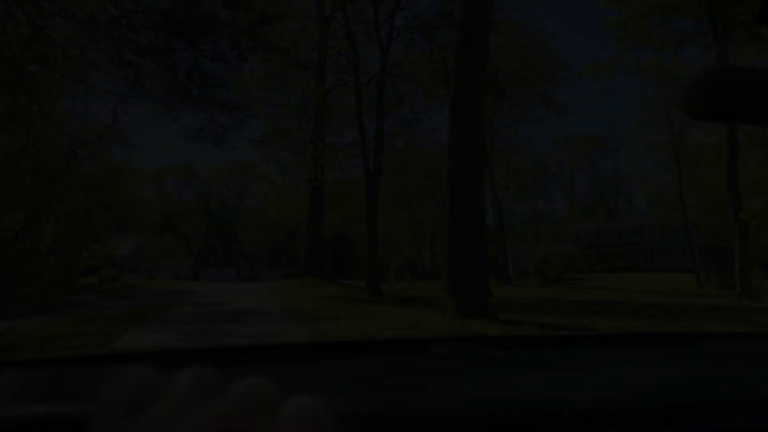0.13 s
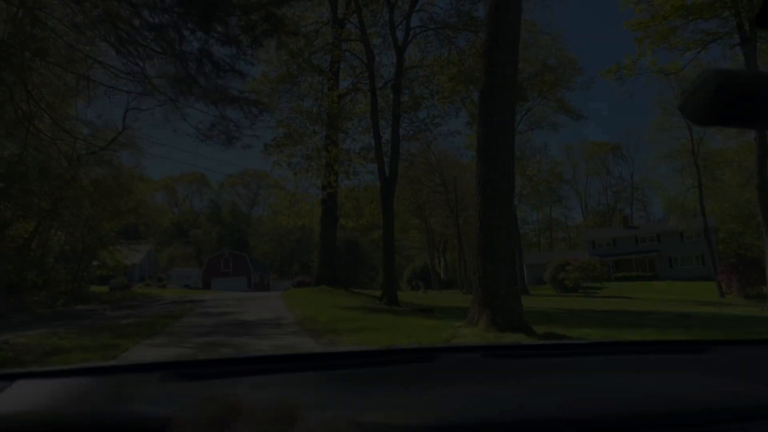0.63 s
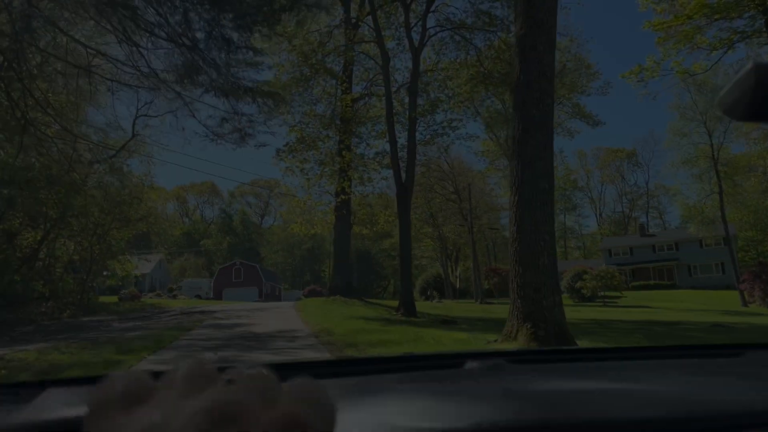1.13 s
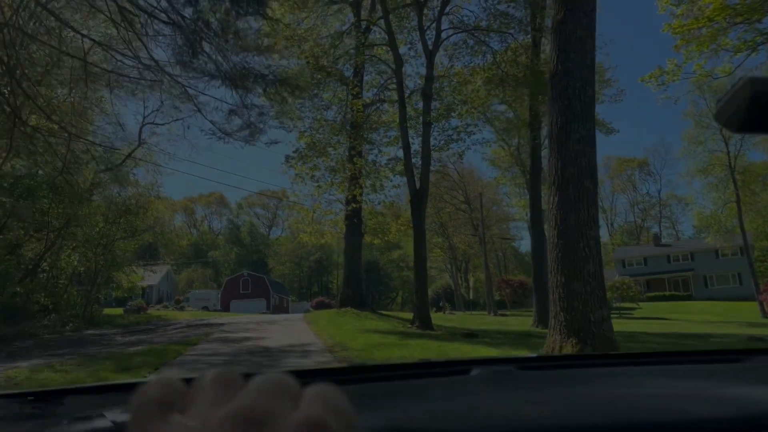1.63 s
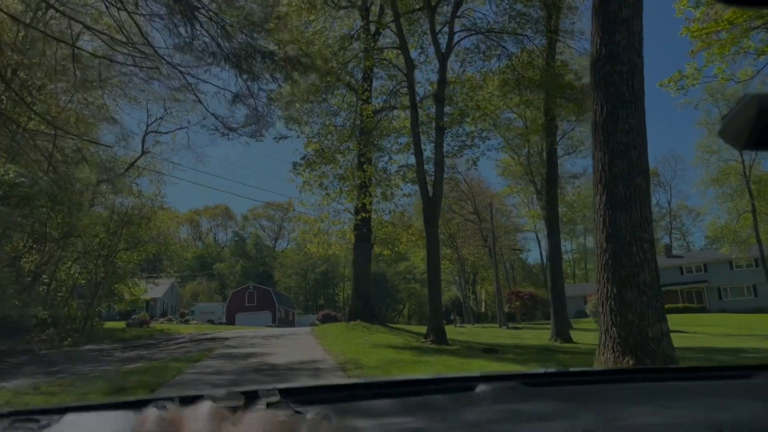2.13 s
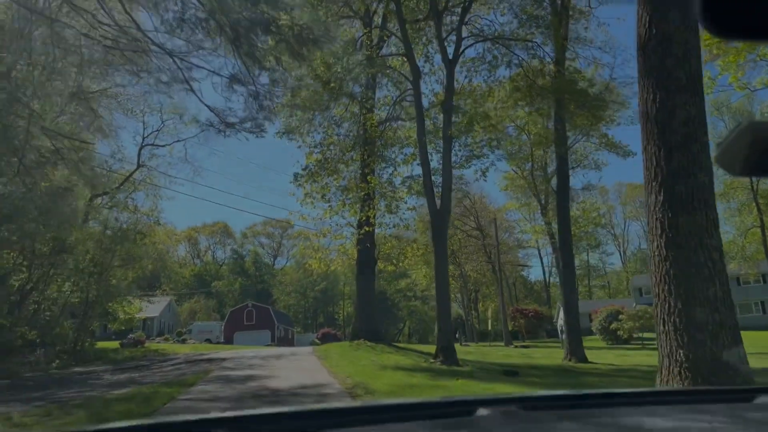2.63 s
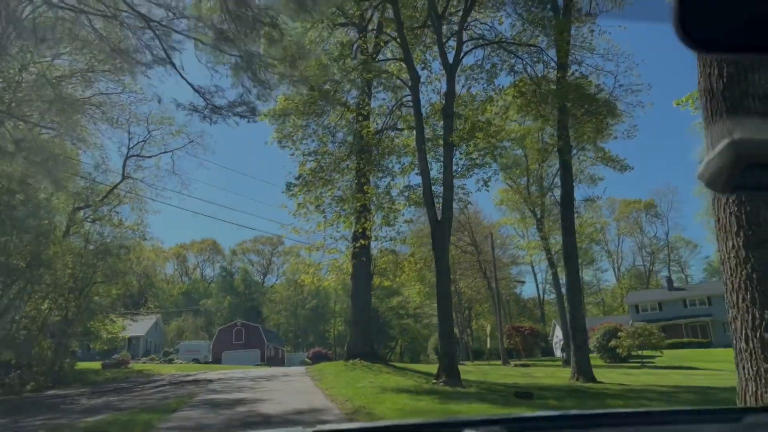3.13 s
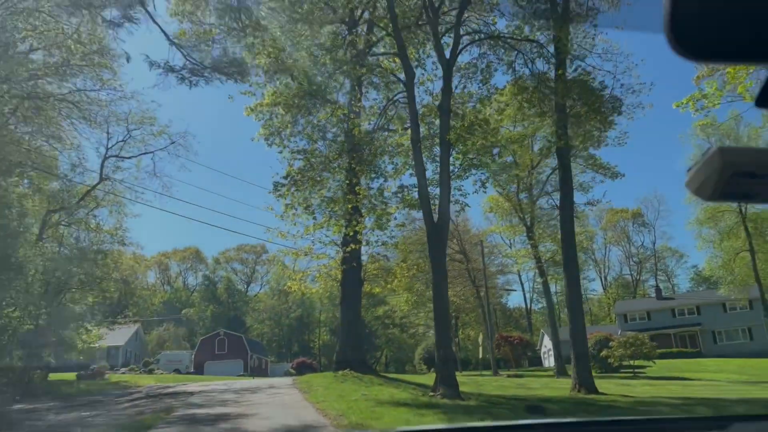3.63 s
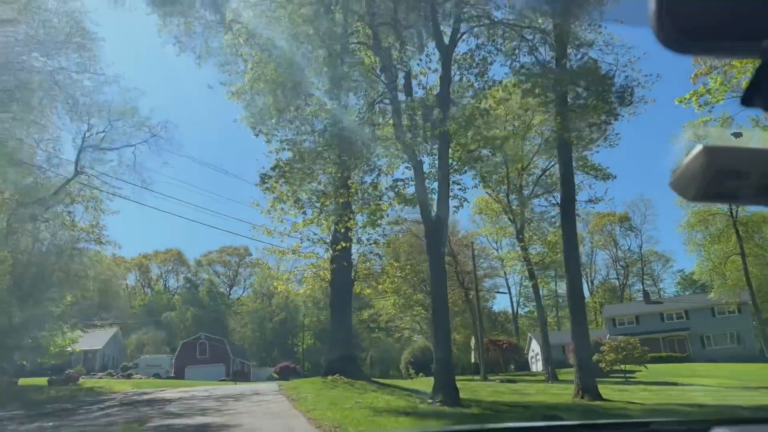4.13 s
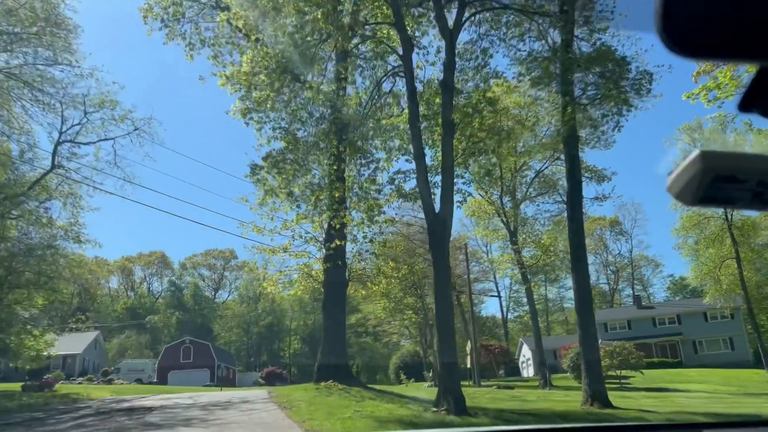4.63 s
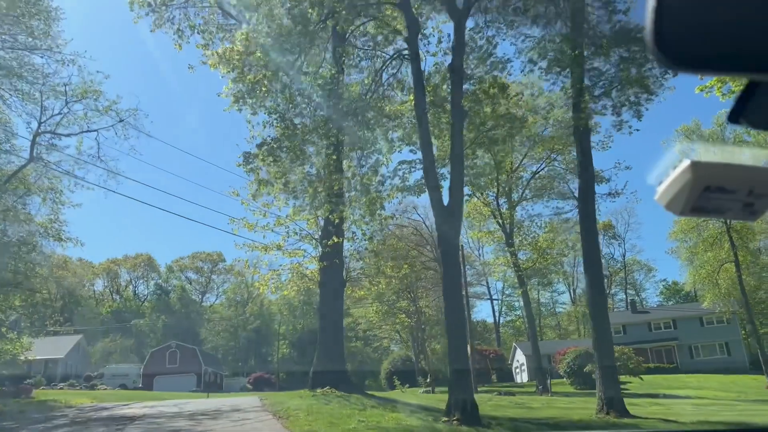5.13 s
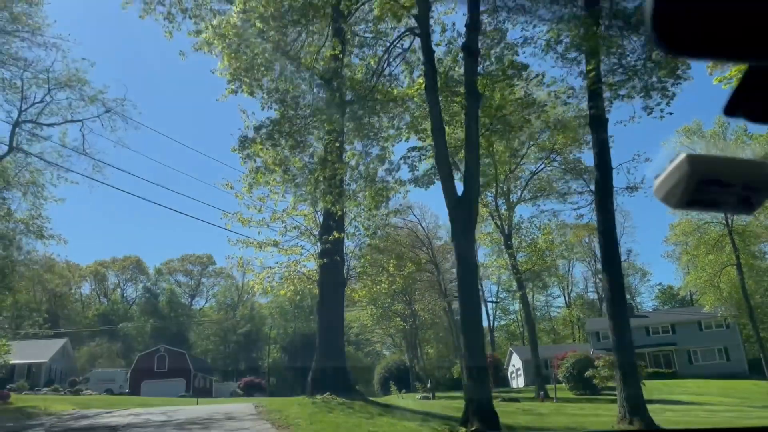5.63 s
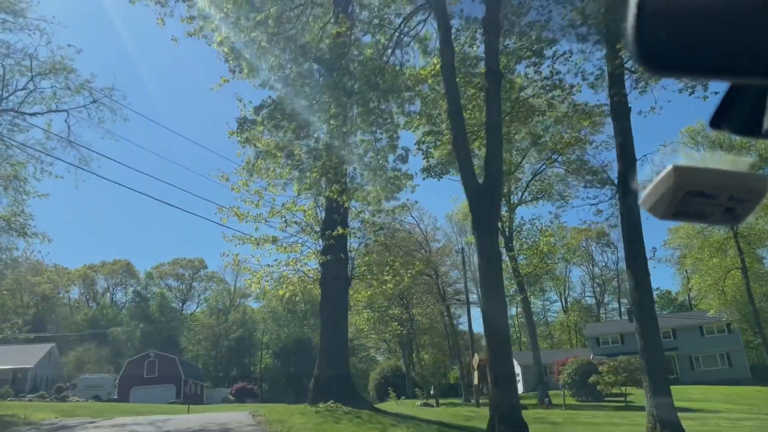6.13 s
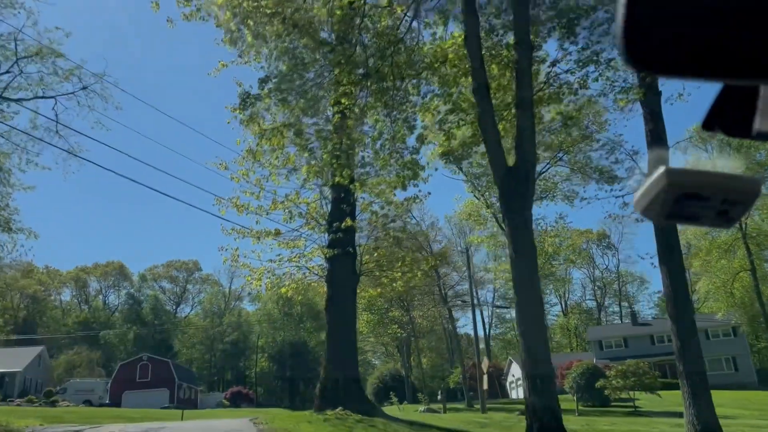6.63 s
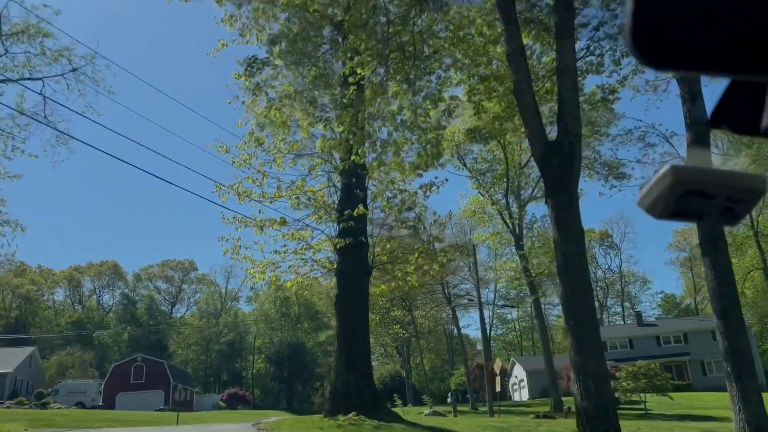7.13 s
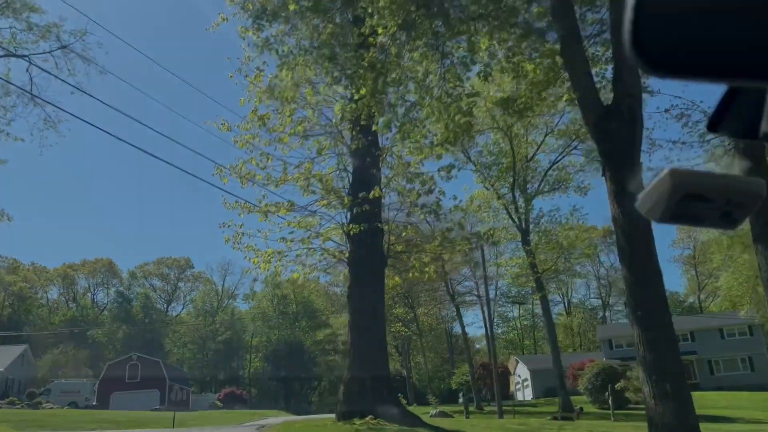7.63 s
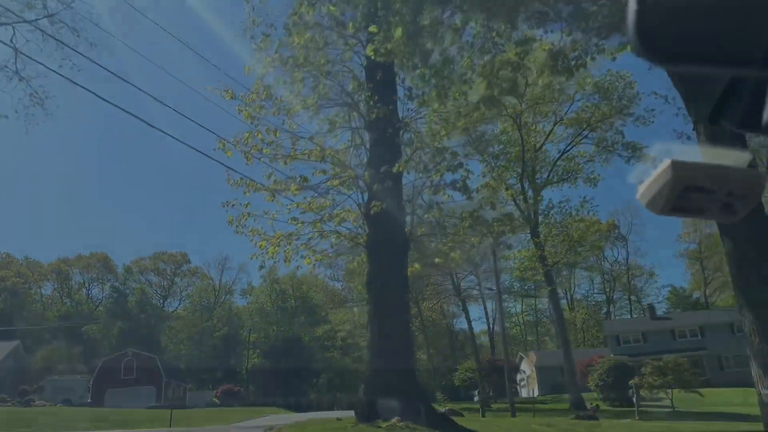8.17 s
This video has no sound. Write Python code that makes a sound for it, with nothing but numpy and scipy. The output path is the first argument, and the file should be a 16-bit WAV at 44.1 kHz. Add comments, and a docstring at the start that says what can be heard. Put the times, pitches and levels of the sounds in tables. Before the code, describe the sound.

Busy stereo birdsong in a leafy yard. A sparse opening with jay calls gives way to a steady chant on the right and a fast trill at far left. A loud central warbler and long clear whistles dominate the middle, then rapid nasal calls at left. Later the chant returns and a close singer grows louder at far right. Trees add a soft echo; distant traffic stays faint.

```python
"""Morning chorus among tall trees

Whistling birds repeat gliding notes from perches around the listener. Jays and a nasal caller sing
stacks of harmonics, a sparrow buzzes with fast vibrato, a wren rattles off chips and a dove coos.
Decaying noise makes the trees' echo. Many faint glides make the far birds; coloured noise makes
the far traffic, rumble, drone, haze and thin hiss."""
import sys
import numpy as np
from scipy import signal
from scipy.fft import rfft, irfft
from scipy.io import wavfile
from scipy.ndimage import uniform_filter1d

SR = 44100
rng = np.random.default_rng(int(sys.argv[2]) if len(sys.argv) > 2 else 0)


def level_to_linear(level):
    """Convert decibel levels to linear amplitude factors, elementwise."""
    exponent = np.asarray(level, float) / 20
    return 10 ** exponent


def digitize_waveform(pressure):
    """Quantize a signal to 16-bit integers and store it at the path in sys.argv[1].

    Rows of a 2-D input are taken as channels; values are limited to [-1, 1].
    """
    field = np.atleast_2d(pressure).T
    bounded = np.clip(field, -1, 1)
    quanta = np.round(bounded * 32767).astype(np.int16)
    wavfile.write(sys.argv[1], SR, quanta)


N = 365148  # samples in the scene
T = np.arange(N) / SR  # seconds

# Perches from far right to far left: left_minus_right_db, left_lag_ms, echo_db
PERCHES = [(-26.5, 0.17, -17), (-10, .35, -15.5), (0, 0.047, -14), (10.5, -.47, -5), (11, -.47, -15)]
FAR_RIGHT, RIGHT, CENTRE, LEFT, FAR_LEFT = PERCHES
# Tone colour of the far chorus: pitch_hz, level_db (relative)
HAZE_COLOUR = [(650, -41.5), (1100, -12), (1590, -12.5), (1940, -17.5), (2410, -3.5), (3400, -2),
               (3850, -9.5), (4740, -11.5), (8090, -26.5), (10500, -57), (13000, -57)]


def add(bus, x, start_s, pan_db, lag_ms, echo_db):
    """Place a sound left and right (rows 0, 1) and send it to the trees (rows 2, 3)."""
    for ch, side in enumerate((1, -1)):
        i = int(round((start_s + side * lag_ms / 2000) * SR))
        gain = np.sqrt(2 / (1 + level_to_linear(-2 * side * pan_db)))
        part = x[max(-i, 0):N - i] * gain
        first = max(i, 0)
        bus[ch::2, first:first + len(part)] += part * np.array([[1], [level_to_linear(echo_db)]])


def walk(count, rate):
    """Smooth chance with spread near 1 that turns about rate times a second."""
    k = int(SR / rate)
    steps = np.repeat(rng.standard_normal(count // k + 1), k)
    return 1.46 * uniform_filter1d(uniform_filter1d(steps, k), k)[:count]


def swell(count, rise_ms, fall_ms):
    """Rounded start and end of a note."""
    ms = np.arange(count) * 1000 / SR
    ramp = np.minimum(ms / rise_ms, ms[::-1] / fall_ms)
    return np.sin(np.pi / 2 * np.clip(ramp, 0, 1)) ** 2


def tone(hz):
    """Sine of rms 1 on a moving pitch."""
    return np.sqrt(2) * np.sin(2 * np.pi * (np.cumsum(hz) / SR + rng.random()))


def harmonic(k, phase):
    """One harmonic of a voice, with its own fixed starting phase."""
    return np.sin(2 * np.pi * k * phase + k * k)


def breath_noise(count, low_hz, high_hz):
    """Noise kept to one band, for the rough air in a voice."""
    band = signal.butter(2, [low_hz, high_hz], "band", fs=SR, output="sos")
    return signal.sosfilt(band, rng.standard_normal(count))


def whistle(ms, start_hz, mid_hz, end_hz, db):
    """A near sine on a bent glide; breath wavers its level, and faint notes flicker more through the leaves."""
    n = int((ms + 4) * SR / 1000)  # 4 ms extra leaves room for the soft ends
    q = np.linspace(-1, 1, n) * (ms + 4) / ms
    slope = (end_hz - start_hz) / 2
    bend = (start_hz + end_hz) / 2 - mid_hz
    hz = mid_hz + slope * q + bend * q ** 2
    waver_db = 1.2 + .08 * max(-44 - db, 0)
    level = level_to_linear(db + waver_db * walk(n, 80))
    return level * swell(n, min(0.34 * ms, 16), min(0.39 * ms, 13)) * tone(hz)


def sing(bus, phrase, times, perch):
    """One phrase at each time; every note strays a little in pitch."""
    for start_s, level_db in times:
        for at, ms, *hz, db in phrase:
            strayed_hz = np.multiply(hz, 1 + 0.0027 * rng.standard_normal())
            add(bus, whistle(ms, *strayed_hz, level_db + db), start_s + at - .002, *perch)


def repeated_phrases(bus):
    """Each whistler repeats one phrase of gliding notes from its perch."""
    # Each first table is a phrase of notes:
    # from_phrase_start_s, length_ms, start_hz, middle_hz, end_hz, level_db (added to the phrase's)
    # Each second table says when the phrase is sung: start_s, level_db
    # loud warbler: rise, drop, arch, long rising slur
    warble = [(0, 52, 2957, 2925, 3223, 0), (.076, 39, 2613, 1893, 1715, -3.5),
              (.152, 49, 3300, 3400, 2720, -2), (.223, 113, 2215, 2452, 2480, 1)]
    warble_times = [(2.588, -41), (3.061, -39), (3.537, -38), (4.038, -39), (7.821, -50)]
    sing(bus, warble, warble_times, CENTRE)
    # the warbler's lead-in: a chip and a steep rise
    lead_in = [(0, 26, 5600, 5000, 5210, -16.5), (.022, 29, 3434, 4256, 4900, 1)]
    lead_in_times = [(2.977, -35.5), (3.454, -34), (3.951, -35), (8.203, -46.5)]
    sing(bus, lead_in, lead_in_times, CENTRE)
    # steady singer, about three phrases a second: rise, short dip, hook, sharp chip, fall
    chant = [(0, 52, 2454, 2505, 2770, -9), (.075, 28, 3070, 2905, 2810, -7.5),
             (.117, 35, 3698, 3327, 4220, 0), (.196, 13, 5500, 4600, 4450, -7),
             (.22, 50, 2367, 2323, 1456, -8)]
    chant_times = [(0.928, -48.5), (1.235, -44), (1.552, -44.5), (1.862, -43), (2.172, -44), (2.493, -44.5),
                   (5.901, -49.5), (6.216, -47), (6.531, -49), (6.842, -50.5), (7.154, -51.5), (7.472, -54)]
    sing(bus, chant, chant_times, RIGHT)
    # singer at the far right whose phrases grow louder
    jingle = [(0, 46, 2150, 2247, 2290, 0), (.058, 15, 2690, 2474, 2400, 3.5),
              (.122, 30, 1577, 1565, 1850, -15), (.151, 20, 2003, 2680, 2550, 2),
              (.204, 15.6, 3620, 3060, 3170, 2)]
    jingle_times = [(7.657, -44.5), (7.887, -37.5), (8.117, -36)]
    sing(bus, jingle, jingle_times, FAR_RIGHT)
    # about five a second: drop, rise, higher rise
    twitter = [(0, 31.9, 3124, 2327, 1990, -2.2), (.042, 30.2, 2560, 2740, 2880, 0.27),
               (.092, 26, 2910, 3170, 3650, -1)]
    twitter_times = [(.052, -55), (0.264, -53.5), (4.398, -52.5), (4.596, -51), (4.796, -50),
                     (4.999, -50.5)]
    sing(bus, twitter, twitter_times, RIGHT)
    # about four a second: long plunge, low rise
    plunge = [(0, 41.94, 3822, 2666, 1900, -5), (.172, 40.2, 1545, 1730, 1860, -10.5)]
    plunge_times = [(5.515, -52.5), (5.775, -50), (6.032, -51.5), (6.286, -54.5), (6.538, -54.5),
                    (6.782, -53), (7.028, -55.5), (7.284, -58.5), (7.531, -58.5)]
    sing(bus, plunge, plunge_times, RIGHT)
    # faint singer: rise, fall, high rise
    lilt = [(0, 43, 2496, 2770, 2930, -1), (.06, 32, 2324, 2190, 1770, -4.5),
            (.188, 42, 4100, 4600, 4980, 1.5)]
    lilt_times = [(5.66, -57), (5.92, -55.5), (6.19, -55), (6.454, -56.5), (6.725, -58.5), (6.995, -58.5)]
    sing(bus, lilt, lilt_times, RIGHT)
    # one faint rising note
    rise = [(0, 40, 3850, 4380, 4960, 0.002)]
    rise_times = [(.155, -61.5), (.495, -62.5), (4.027, -59), (4.355, -58), (4.678, -58.5), (5.0, -56.5),
                  (5.344, -54), (7.534, -64.5)]
    sing(bus, rise, rise_times, LEFT)
    # one higher, thin rising note
    thin_rise = [(0.0014, 40, 6200, 6850, 7400, 0.0094)]
    thin_rise_times = [(1.481, -73), (1.54, -74.5), (2.215, -75), (2.55, -56.5), (2.84, -71.5),
                       (4.614, -64), (6.738, -69.5), (8.091, -78)]
    sing(bus, thin_rise, thin_rise_times, CENTRE)
    # one thin note that dips and returns
    thin_dip = [(0.0014, 175, 7600, 5750, 7500, 0.0028)]
    thin_dip_times = [(1.575, -74)]
    sing(bus, thin_dip, thin_dip_times, CENTRE)
    # near singer: two long clear whistles, the second broken in two
    fee_bee = [(0, 343, 4125, 4001, 4013, 0.0047), (.485, 207, 3510, 3530, 3537, 0.0024),
               (.695, 172, 3515, 3515, 3500, 0)]
    fee_bee_times = [(3.54, -34)]
    # its perch: left_minus_right_db, left_lag_ms, echo_db
    near_perch = (0, .045, -23)
    sing(bus, fee_bee, fee_bee_times, near_perch)
    # a low slur; the octave sounds with it
    low_slur = [(0, 252.5, 1530, 1520, 1463, -1.5), (0, 257, 3085, 3044, 2897, 4)]
    low_slur_times = [(5.089, -64), (5.879, -65), (6.72, -69), (7.52, -76.5)]
    sing(bus, low_slur, low_slur_times, RIGHT)


def trills(bus):
    """An opening fall and rise, then down and up strokes at a steady rate, fading."""
    # Opening notes: from_start_s, length_ms, start_hz, middle_hz, end_hz, level_db (added to the trill's)
    opening = [(0, 35.4, 4075, 3606, 2860, -1.5), (.045, 32.2, 2120, 2546, 2800, -11)]
    # One down and up stroke pair, same columns as the opening
    strokes = [(0, 22, 3800, 3632, 2920, 1.5), (.04, 29.6, 2176, 2594, 2736, -7)]
    # Trills: first_stroke_s, level_db, silent_from_s
    trill_times = [(1.848, -39, 2.47), (7.323, -46, 7.93)]
    opening_s, period_s, fade_db_per_s = .08, .0733, -12.5
    for start_s, db, end_s in trill_times:
        sing(bus, opening, [(start_s - opening_s, db)], FAR_LEFT)
        stroke_times = [(start_s + at, db + fade_db_per_s * at) for at in np.arange(0, end_s - start_s, period_s)]
        sing(bus, strokes, stroke_times, FAR_LEFT)


def single_notes(bus):
    """Lone whistles with straight glides, scattered over the perches."""
    # One list of notes a perch: start_s, length_ms, start_hz, end_hz, level_db
    notes_by_perch = [
        [(0.47, 8.4, 2500, 2900, -59), (7.854, 7, 3900, 3500, -52), (8.083, 16, 5100, 2200, -58),
         (5.314, 59, 3900, 3840, -46.5), (9.3, 18, 2700, 3000, -41)],
        [(.105, 58, 4120, 3950, -51.5), (.215, 213, 4056, 3984, -60), (.428, 96, 3404, 3510, -53),
         (.845, 35, 2390, 1860, -56.5), (2.544, 46, 5900, 6600, -60.5), (3.315, 67, 3947, 3890, -48),
         (3.773, 12, 5795, 4860, -55), (3.953, 16, 6200, 6100, -60.5), (4.171, 49, 5830, 6450, -60.5),
         (5.816, 31, 2450, 1700, -58), (5.895, 57, 4100, 3980, -45.5), (6.16, 150, 2863, 2936, -56.5)],
        [(2.528, 10, 5950, 5030, -58), (2.536, 24, 5090, 4970, -46.5), (2.995, 30, 4840, 5510, -58),
         (4.82, 52, 5570, 5270, -65.5), (5.35, 94, 1150, 1106, -74), (5.99, 90, 5300, 5130, -64.5),
         (7.743, 35, 5090, 4890, -59.5)],
        [(1, 9.1, 5382, 5900, -66), (1.93, 33.5, 3300, 2400, -44), (7.415, 100, 1250, 2100, -76.5),
         (7.525, 39, 4100, 6500, -70), (5.111, 89, 2450, 2560, -58)],
        [(.385, 15, 4430, 4900, -62), (.47, 18, 2945, 3440, -50), (.995, 7.4, 4800, 6000, -51.5),
         (3.196, 9.4, 3170, 6070, -42), (3.202, 11, 5690, 3180, -41), (4.939, 25, 4660, 4600, -60.5),
         (5.285, 54, 6720, 5830, -67.5), (5.64, 14, 4920, 6100, -57), (7.199, 82, 7340, 7450, -75)],
    ]
    for perch, notes in zip(PERCHES, notes_by_perch):
        for start_s, ms, start_hz, end_hz, db in notes:
            note = whistle(ms, start_hz, (start_hz + end_hz) / 2, end_hz, db)
            add(bus, note, start_s - .002, *perch)


def arches(bus):
    """High whistles that rise, hold and plunge."""
    # Notes: start_s, length_ms, top_hz, level_db
    arch_notes = [(4.254, 67, 7330, -45), (4.344, 33, 6920, -45), (4.428, 54, 6370, -45)]
    # Pitch curve: share_of_note, share_of_top_pitch
    arch_shape = [(0, .86), (.15, .95), (.45, .99), (.72, 1.0), (.86, .96), (1, .64)]
    # Where they are: left_minus_right_db, left_lag_ms, echo_db
    arch_perch = (13, -.42, -21.5)
    for start_s, ms, top_hz, db in arch_notes:
        n = int(ms * SR / 1000)
        curve = np.interp(np.linspace(0, 1, n), *np.transpose(arch_shape))
        hz = uniform_filter1d(top_hz * curve, size=100, mode="nearest")
        add(bus, level_to_linear(db) * swell(n, 6.8, 2.7) * tone(hz), start_s, *arch_perch)


def jays(bus):
    """A harmonic stack that scoops up, sags, and turns hoarse towards its end."""
    # Calls: start_s, length_s, top_pitch_hz, end_pitch_hz, level_db (at the start), left_minus_right_db
    calls = [(-.05, .235, 849, 781, -53.5, 6.5), (0.691, 0.25, 852.4, 796.6, -44.5, 2),
             (3.043, 0.25, 812, 780, -51, -19), (5.42, .27, 805.4, 806, -48, -26),
             (6.93, 0.22, 811, 789, -56.5, -16)]
    # Voice: harmonic_number, level_db (within the call)
    voice = [(1, -25), (2, -8), (3, -13), (4, 3), (5, -15), (6, -10), (7, -10), (8, -16), (9, -39),
             (10, -38)]
    for start_s, length_s, top_hz, end_hz, db, pan_db in calls:
        n = int(length_s * SR)
        q = np.linspace(0, 1, n)  # share of the call
        hz = np.interp(q, [0, .1, .5, .92, 1], [0.77 * top_hz, top_hz, .99 * top_hz, end_hz, end_hz])
        hoarse = .3 + .9 * q
        phase = np.cumsum(hz * (1 + .007 * hoarse * walk(n, 600))) / SR
        # a throb near 250 Hz adds side tones around each harmonic
        flutter = 1 + .3 * np.sin(2 * np.pi * np.cumsum(250 + 20 * walk(n, 100)) / SR)
        stack = np.zeros(n)
        for k, h_db in voice:
            waver_db = 2.2 * hoarse * walk(n, 150) + 2.43 * walk(n, 44.7)
            dulling_db = -0.25 * k * q
            stack += level_to_linear(h_db + waver_db + dulling_db) * harmonic(k, phase)
        rasp = level_to_linear(-22) * hoarse * breath_noise(n, 2300, 7000)
        call = level_to_linear(db - 3.2 * q) * swell(n, 32, 24) * (flutter * stack + rasp)
        add(bus, call, start_s, pan_db, .02, -10)


def nasal_caller(bus):
    """A rich stack on an arched pitch; the ninth harmonic is set loudest."""
    # Calls: start_s, length_s, top_pitch_hz, level_db, treble_tilt_db (per harmonic above the tenth)
    calls = [(4.51, 0.17, 381.7, -49.5, -1.1), (4.781, 0.14, 403.6, -49.5, -0.7),
             (4.989, 0.12, 412.4, -49.5, -1.2), (5.186, .13, 401, -49.5, -0.9), (5.37, .11, 401, -49, -1.4),
             (5.53, .13, 411, -48, -1.75), (5.711, 0.13, 408, -49, -0.95), (5.887, 0.11, 400, -46, -0.73),
             (6.055, .105, 390.4, -47.5, -0.43), (6.193, 0.099, 397, -45.5, -0.63),
             (6.34, 0.087, 367, -51.5, -0.13), (6.51, 0.075, 385, -58.5, -6)]
    # Pitch curve: share_of_call, share_of_top_pitch
    pitch_arch = [(0, .82), (.2, .93), (.45, .99), (.75, 1.0), (.9, .98), (1, .9)]
    # Voice, read between its points: harmonic_number, level_db (within the call)
    voice = [(4, -36), (7, -19), (8, -8), (9, -2), (10, -16), (12, -19), (14, -18), (16, -30), (20, -40),
             (32, -58)]
    for start_s, length_s, top_hz, db, tilt_db in calls:
        n = int(length_s * SR)
        curve = np.interp(np.linspace(0, 1, n), *np.transpose(pitch_arch))
        hz = uniform_filter1d(top_hz * curve, size=400)
        jitter = 0.0033 * walk(n, 86) + 0.0035 * walk(n, 500)
        phase = np.cumsum(hz * (1 + jitter)) / SR
        stack = np.zeros(n)
        for k in range(4, 33):
            h_db = np.interp(k, *np.transpose(voice)) + tilt_db * max(k - 10, 0)
            stack += level_to_linear(h_db + 1.07 * walk(n, 56.3)) * harmonic(k, phase)
        breath = level_to_linear(-15.5 + 10 * tilt_db) * breath_noise(n, 2500, 7000)
        call = level_to_linear(db) * np.sqrt(2) * swell(n, 27, 14) * (stack + breath)
        add(bus, call, start_s, 21, .75, -15)


def sparrow(bus):
    """A whistle that breaks into ever wider, fast and uneven vibrato; the level throbs with it."""
    # Course of a buzz: from_start_s, centre_hz, swing_hz, level_db (added to the call's)
    buzz = [(0, 4750, 1, -68), (.02, 4628, 11.5, -40.5), (.04, 4628, 18.5, -34), (0.064, 4484, 149, -37.5),
            (.11, 4452, 301.5, -38.5), (.16, 4200, 456.5, -44.5), (0.184, 4031, 482.5, -45),
            (0.205, 3920, 481, -59)]
    # When it is sung: start_s, level_db
    buzz_times = [(1.586, 1), (7.068, -5)]
    vibrato_hz = 228  # average rate
    s, *columns = np.transpose(buzz)
    t = np.arange(int(s[-1] * SR)) / SR
    centre_hz, swing_hz, db = (np.interp(t, s, c) for c in columns)
    for start_s, call_db in buzz_times:
        turn = 2 * np.pi * np.cumsum(vibrato_hz * (1 + .075 * walk(len(t), 150))) / SR
        throb = 1 + np.minimum(swing_hz / 300, .8) * np.cos(turn + 1.1)
        uneven = level_to_linear(swing_hz / 280 * walk(len(t), 200))
        voice = tone(centre_hz + swing_hz * np.sin(turn))
        add(bus, level_to_linear(db + call_db) * throb * uneven * voice, start_s, 13, -.47, -8)


def wren(bus):
    """Upward chips about a hundred a second, each lower than the last."""
    # Rattles: start_s, level_db, left_minus_right_db
    rattles = [(1.29, -51, 15), (6.77, -55.5, 18)]
    # Fall of the chips: from_start_s, pitch_hz, level_db (added to the rattle's)
    rattle_fall = [(0, 4640, -2.5), (.03, 3850, 5.5), (0.071, 3060, 4.5), (.11, 2500, -2.5),
                   (.149, 2020, -10.5)]
    chip_ms, glide = 6.0, .06  # glide: share of pitch each way
    s, hz, db = np.transpose(rattle_fall)
    for start_s, call_db, pan_db in rattles:
        for at, (late, loud) in zip(.0098 * np.arange(16), rng.standard_normal((16, 2))):
            centre_hz = np.interp(at, s, hz)
            chip_db = call_db + np.interp(at, s, db) + 1.2 * loud
            chip = whistle(chip_ms, (1 - glide) * centre_hz, centre_hz, (1 + glide) * centre_hz, chip_db)
            add(bus, chip, start_s + at + .0004 * late, pan_db, .4, -9.5)


def dove(bus):
    """Soft coos: slow-edged sines whose pitch wanders slightly."""
    # Coos: start_s, length_s, pitch_hz, level_db
    coos = [(.34, .24, 516.6, -67.5), (1.11, .35, 517.7, -70.5)]
    for start_s, length_s, hz, db in coos:
        n = int(length_s * SR)
        coo = level_to_linear(db) * swell(n, 60, 60) * tone(hz * (1 + .004 * walk(n, 27)))
        add(bus, coo, start_s, -3, 0, -10)


def thump(bus):
    """A dull knock: a low sine that dies away quickly."""
    # Knocks: start_s, pitch_hz, level_db, time_to_fall_60_db_s
    knocks = [(8.095, 113, -45.5, 0.061)]
    t = T[:SR // 4]
    for start_s, hz, db, t60_s in knocks:
        knock = level_to_linear(db - 60 * t / t60_s) * swell(len(t), 11, 8) * np.sin(2 * np.pi * hz * t)
        add(bus, knock, start_s, -6, 0, -30)


def far_birds(db):
    """Many faint, short glides that reach the yard mostly as echo."""
    bus = np.zeros((4, N))
    colour_hz, colour_db = np.transpose(HAZE_COLOUR)
    for when, size, pitch, glide, bend, loud, perch in rng.random((700, 7)):
        hz = 1400 * 3.6 ** pitch
        mid_hz = hz * (1 + .2 * (glide - .5) + .1 * (bend - .5))
        end_hz = hz * (1 + .6 * (glide - .5))
        note_db = -8 * loud + np.interp(np.log(hz), np.log(colour_hz), colour_db)
        note = whistle(12 + 25 * size ** 2, hz, mid_hz, end_hz, note_db)
        pan_db, lag_ms, _ = PERCHES[int(perch * len(PERCHES))]
        add(bus, note, when * N / SR, pan_db, lag_ms, 5)
    return level_to_linear(db - 9) * bus


def trees(x):
    """Scattered echoes off trunks: decaying noise, patchy in level, different left and right."""
    t60_s = 0.89  # time to fall 60 dB
    t = T[:SR]
    decay = level_to_linear(-60 * t / t60_s + 3.5 * walk(SR, 90))
    echo = rng.standard_normal((2, SR)) * decay * np.minimum(t / .006, 1)
    echo = signal.lfilter(*signal.butter(2, 6000, fs=SR), echo)  # leaves swallow the treble
    echo = echo / np.sqrt(np.sum(echo ** 2, 1, keepdims=True))
    return signal.fftconvolve(x, echo, axes=1)[:, :N]


def noise(points, alike):
    """Stereo noise of rms 1 with a (Hz, dB) colour; alike = correlation of left and right."""
    hz, db = np.transpose(points)
    f = np.fft.rfftfreq(N, 1 / SR) + 1
    colour = level_to_linear(np.interp(np.log(f), np.log(hz), db))
    mid, side = irfft(rfft(rng.standard_normal((2, N))) * colour, N)
    x = np.sqrt(1 + alike) * mid + np.sqrt(1 - alike) * side * np.array([[1], [-1]])
    return x / np.std(x)


def haze(db):
    """Coloured noise that wavers and follows the far birds' level, like a blurred chorus."""
    return level_to_linear(db - 11 + 0.88 * walk(N, 15)) * noise(HAZE_COLOUR, 0.16)


def traffic(db):
    """Far traffic: mostly low noise, a little stronger at the right."""
    # Tone colour: frequency_hz, level_db (per Hz, relative)
    traffic_colour = [(12, -37.5), (20, -23), (65, -8), (157, -15), (225, -3), (360, 1.5), (619, 0),
                      (1010, -5.5), (1350, -6.5), (1500, -1.5), (1950, -24.5), (3300, -120)]
    return level_to_linear(db + np.array([[-1.8], [1.8]])) * noise(traffic_colour, 0.47)


def rumble():
    """Very low noise, the same on both sides, that sinks a little late on."""
    colour = [(15, -29.0), (30, -3.5), (60, -0.5), (110, -9), (200, -60.5)]  # Hz, dB
    return level_to_linear(-79.5 - 3.8 * np.clip(T - 5.5, 0, 1)) * noise(colour, 1.0)


def drone(db):
    """A deep band of noise, stronger at the right."""
    colour = [(60, -31), (105, -4.5), (180, -1.5), (260, -33.0)]  # Hz, dB
    return level_to_linear(db + np.array([[-4], [4]])) * noise(colour, 0.26)


def hiss():
    """Thin treble noise that comes and goes."""
    # Course: time_s, level_db
    hiss_course = [(0, -112), (2.98, -112), (3.01, -81), (3.7, -79.5), (3.85, -90.5), (5.04, -84.5),
                   (5.07, -112), (6.76, -112), (6.79, -88.5), (8.28, -106)]
    # Tone colour: frequency_hz, level_db (per Hz, relative)
    hiss_colour = [(5000, -25), (7500, -3), (10000, -3.5), (12600, -4.5), (13200, -8.5), (15600, -10.5),
                   (16000, -60.5)]
    return level_to_linear(np.interp(T, *np.transpose(hiss_course))) * noise(hiss_colour, 0.26)


def scene():
    """Near birds and far birds share the trees; traffic, rumble, drone, haze and hiss lie under them."""
    # Background course: time_s, traffic_db, far_birds_db (before each layer's own offset), drone_db
    background = [(0, -71, -48.5, -93.5), (.8, -66, -56, -100.5), (3.1, -63.5, -49, -99.5),
                  (4.4, -64, -47.5, -93.5), (4.601, -68.5, -50, -94.5), (6.7, -71, -54.5, -94),
                  (6.851, -72, -56, -78.5), (8.28, -71, -61, -74)]
    s, *columns = np.transpose(background)
    traffic_db, far_db, drone_db = (np.interp(T, s, c) for c in columns)
    bus = far_birds(far_db)
    for source in (repeated_phrases, trills, single_notes, arches, jays, nasal_caller, sparrow, wren, dove, thump):
        source(bus)
    birds = bus[:2] + trees(bus[2:])
    return birds + haze(far_db) + traffic(traffic_db) + rumble() + drone(drone_db) + hiss()


def low_pass(x):
    """Removes everything above the highest recorded frequency."""
    return signal.sosfilt(signal.butter(12, 15700, fs=SR, output="sos"), x)


def record(dry):
    """The last step on the finished mix."""
    return low_pass(dry)


dry = scene()
out = record(dry)
digitize_waveform(out)
```